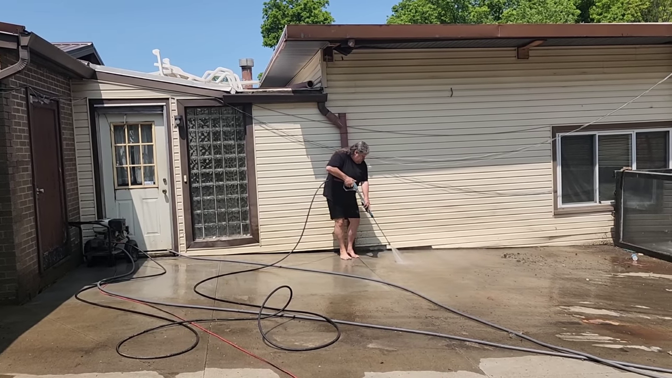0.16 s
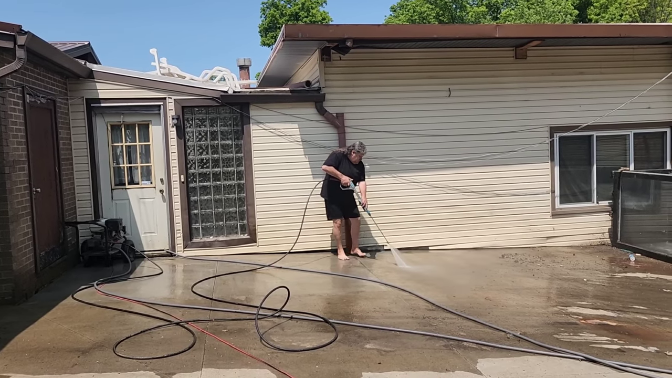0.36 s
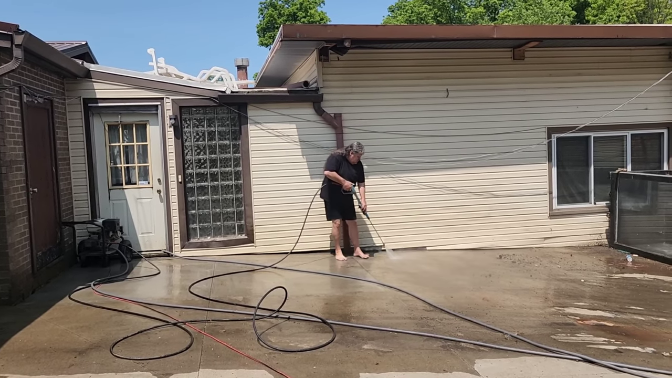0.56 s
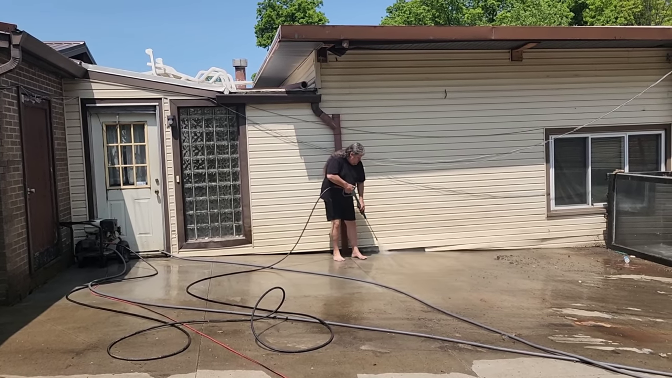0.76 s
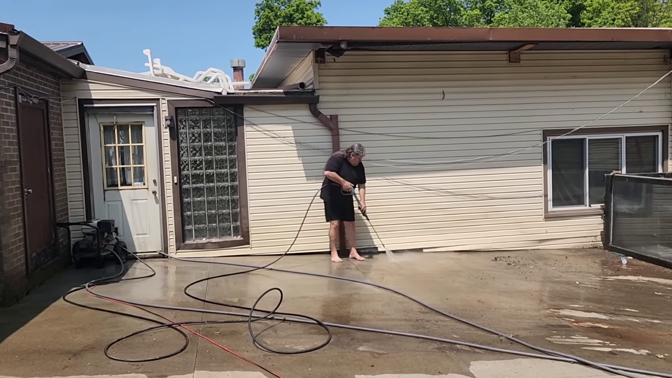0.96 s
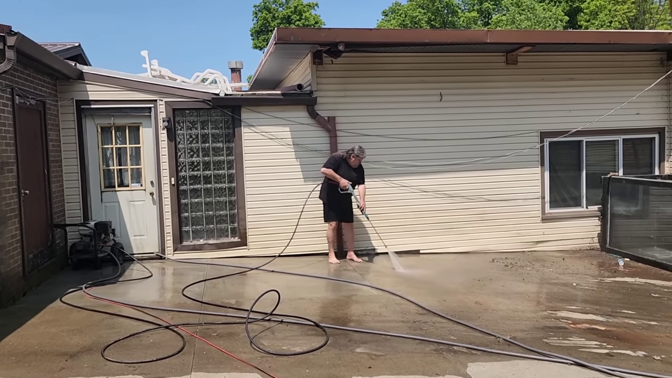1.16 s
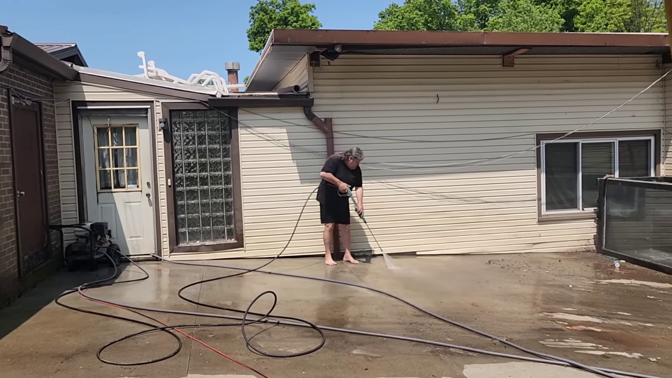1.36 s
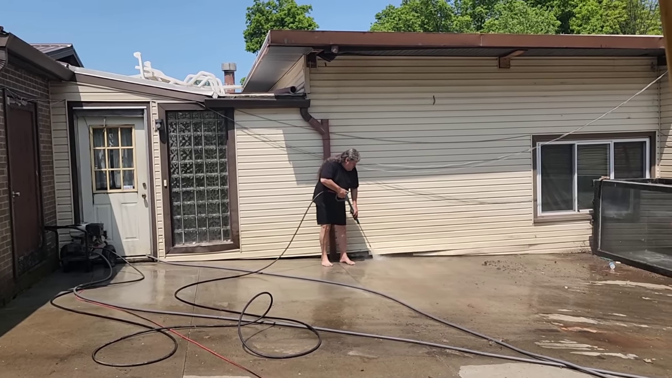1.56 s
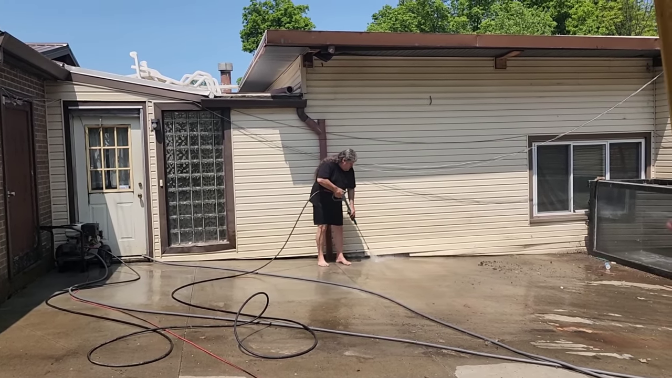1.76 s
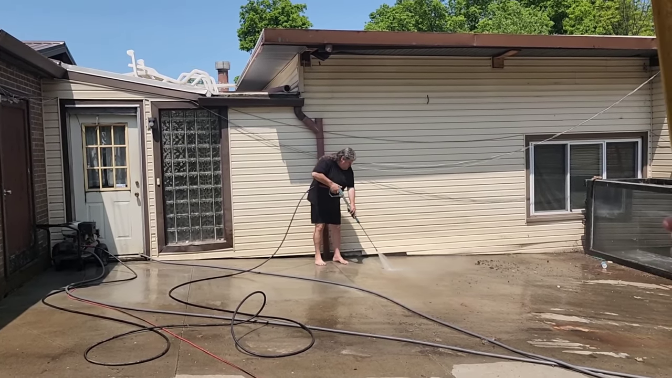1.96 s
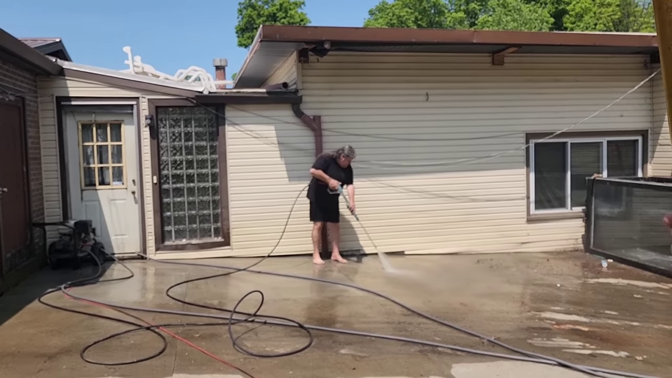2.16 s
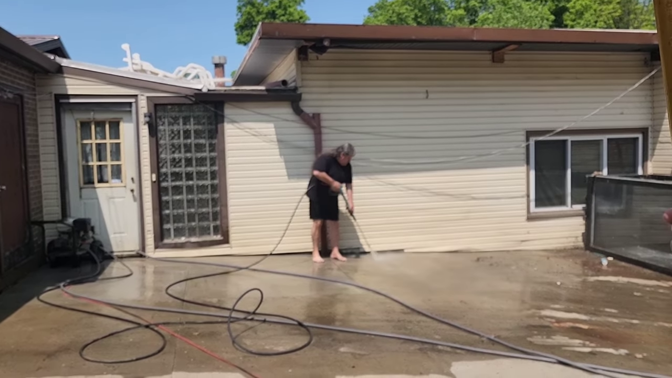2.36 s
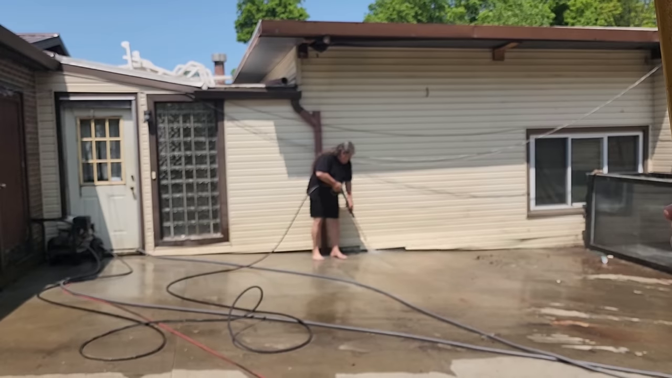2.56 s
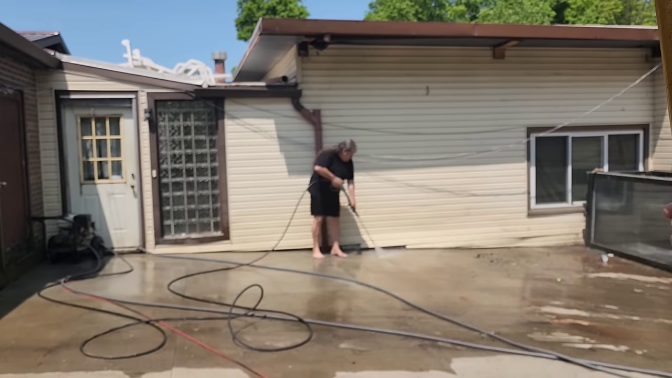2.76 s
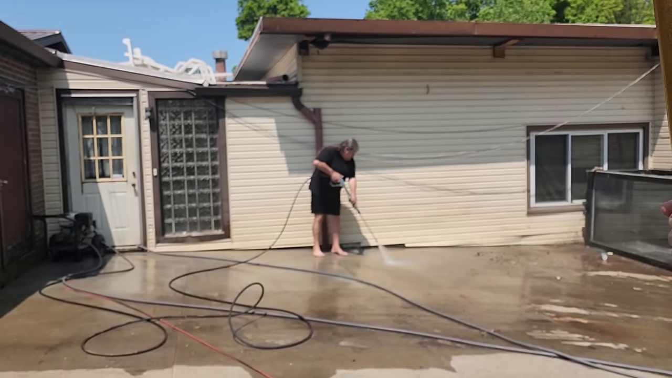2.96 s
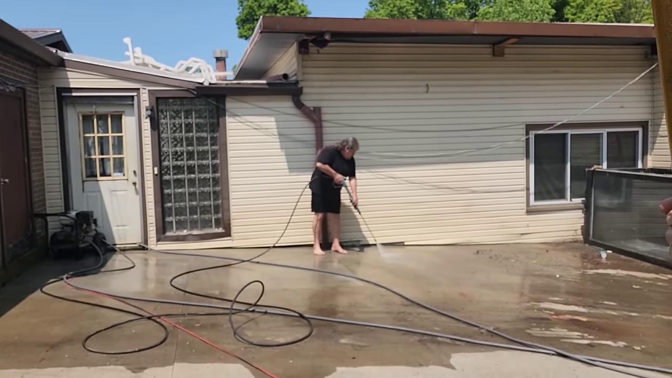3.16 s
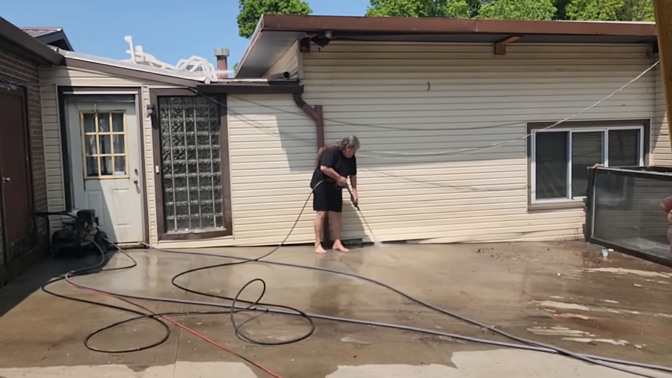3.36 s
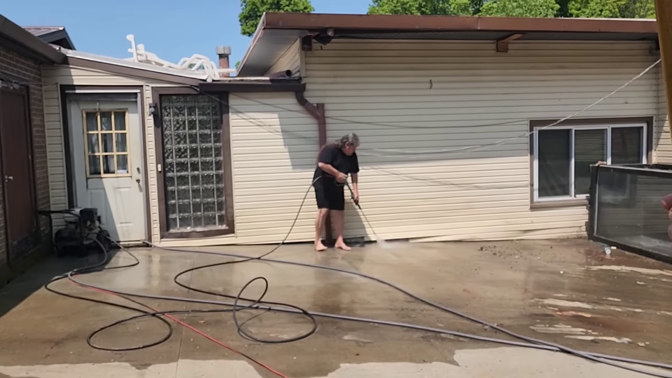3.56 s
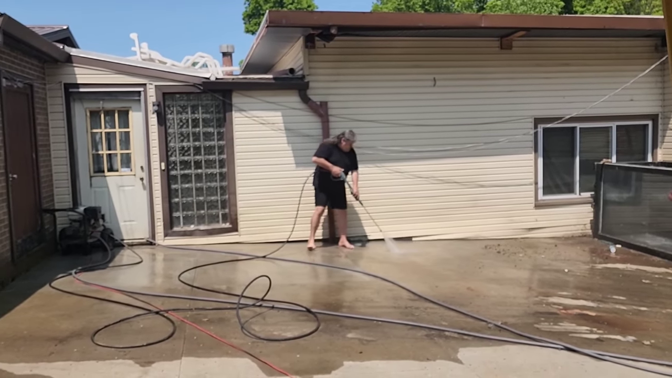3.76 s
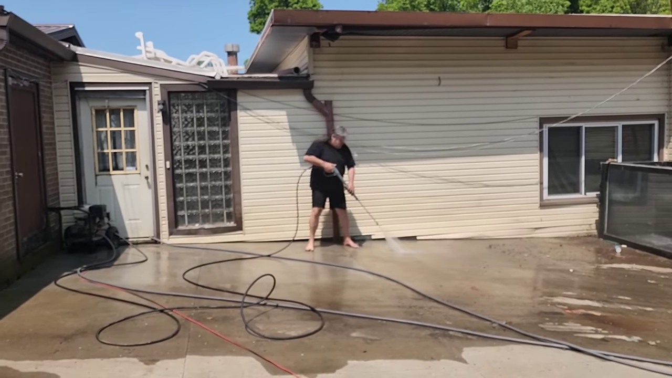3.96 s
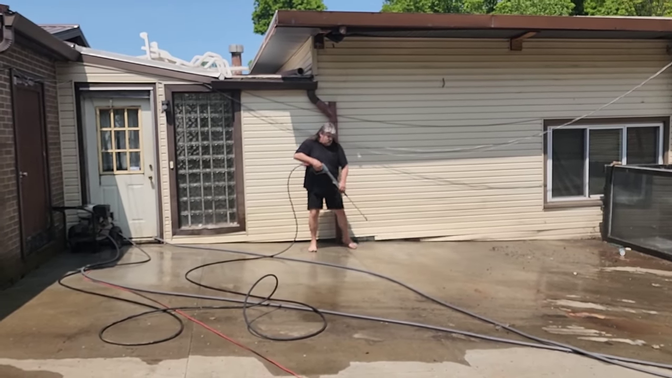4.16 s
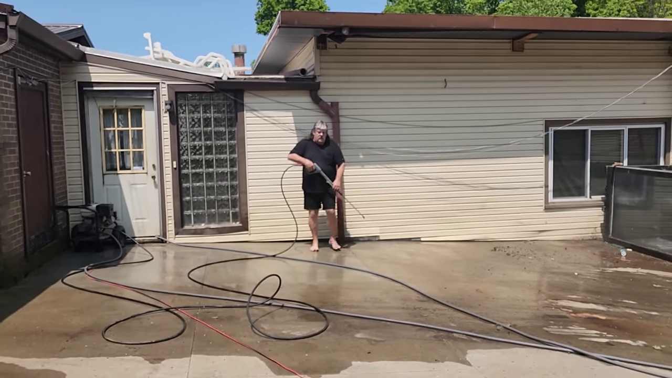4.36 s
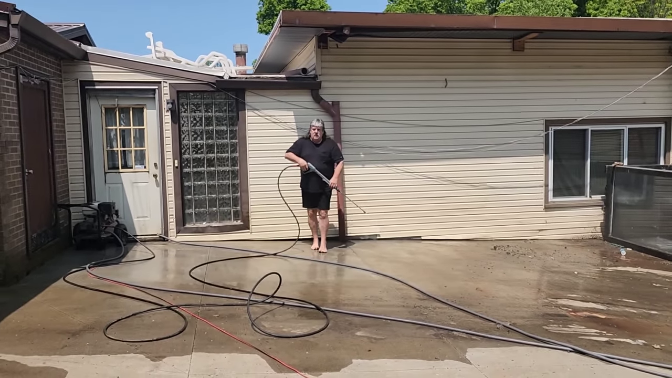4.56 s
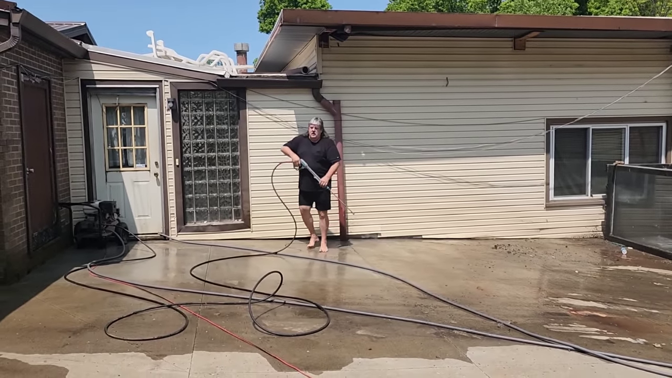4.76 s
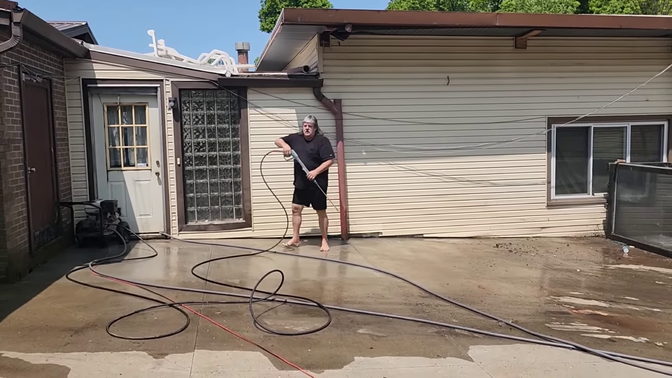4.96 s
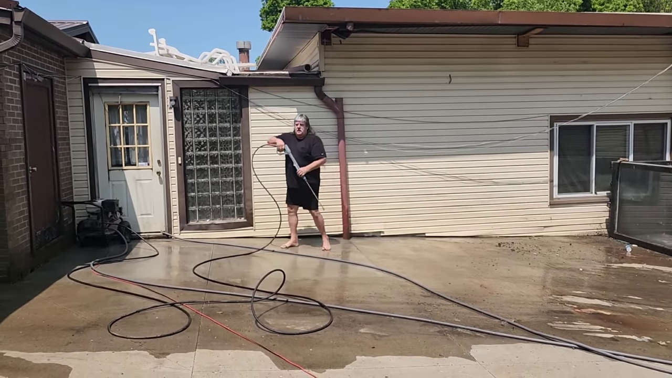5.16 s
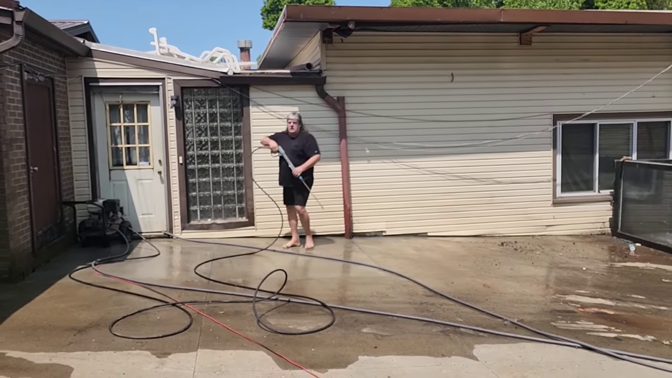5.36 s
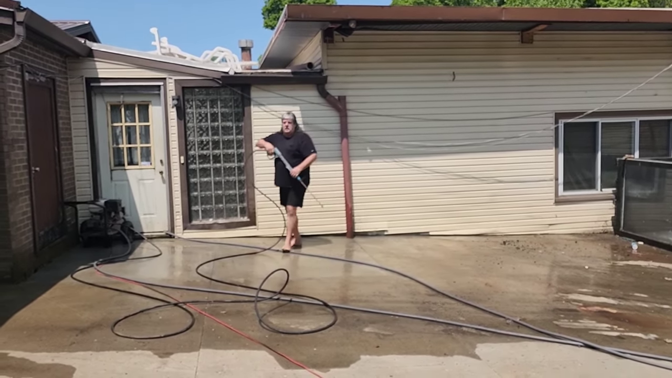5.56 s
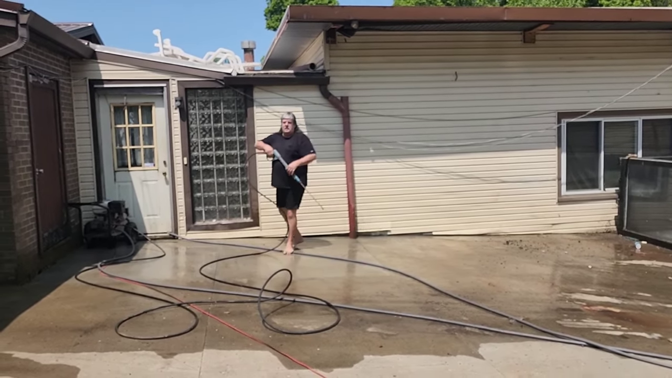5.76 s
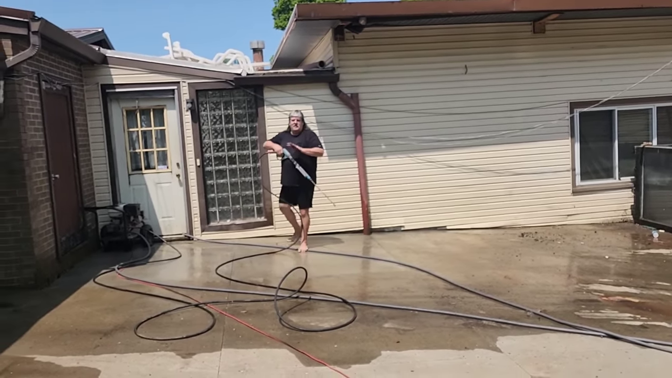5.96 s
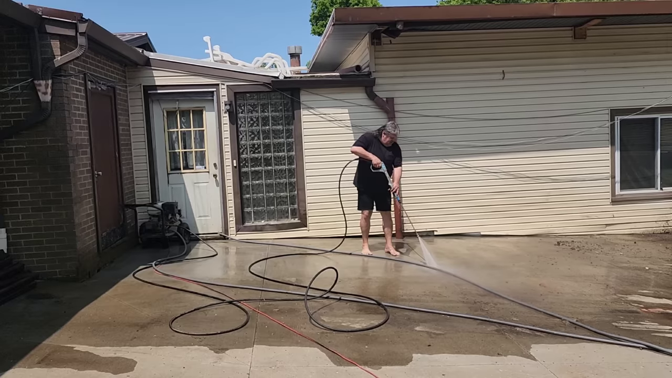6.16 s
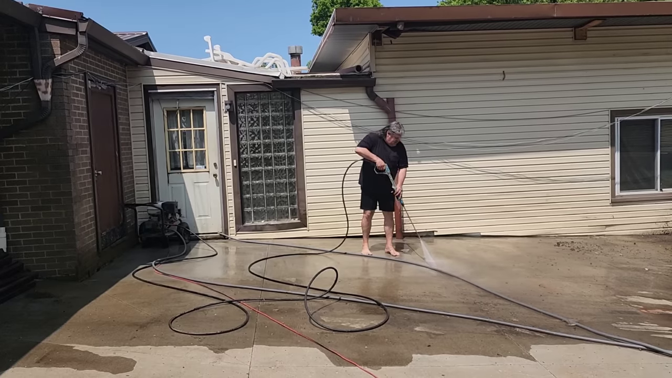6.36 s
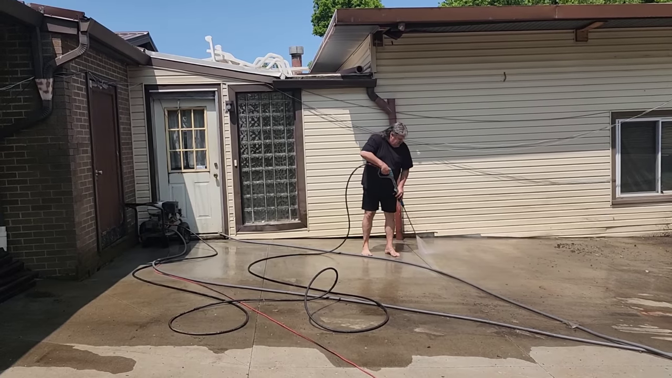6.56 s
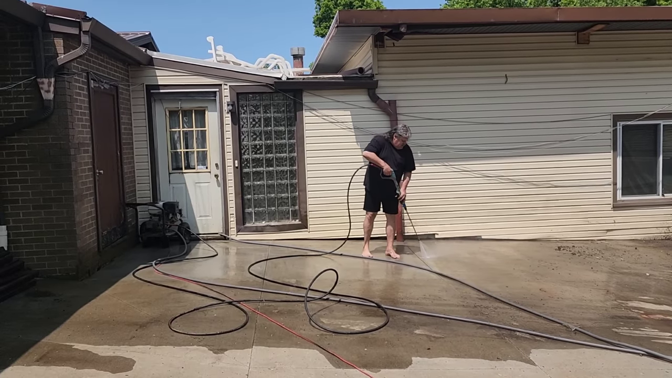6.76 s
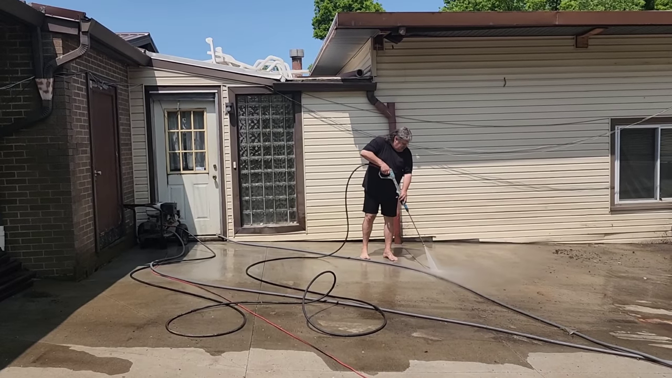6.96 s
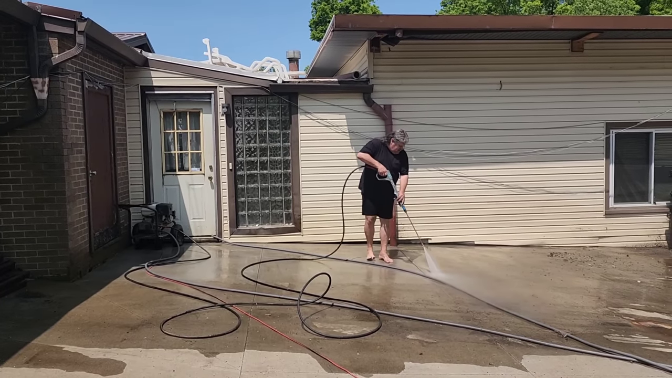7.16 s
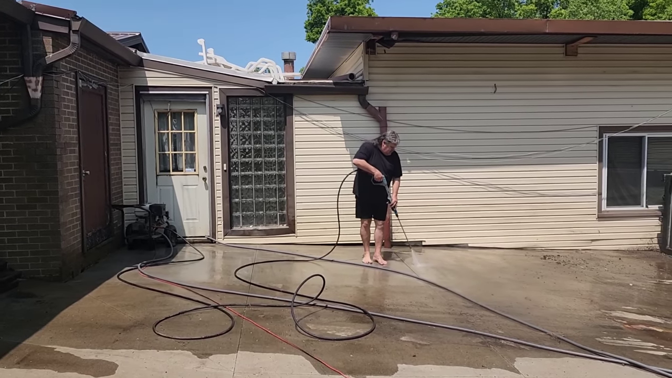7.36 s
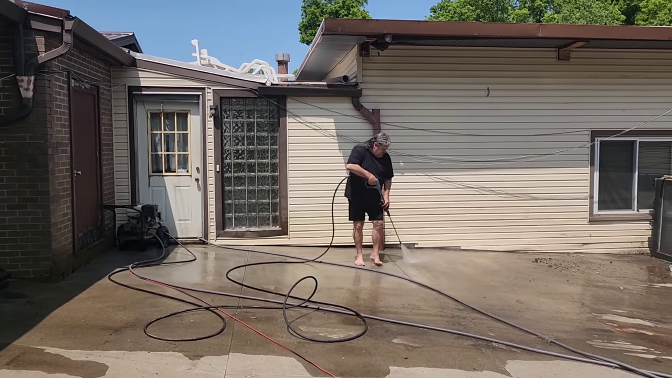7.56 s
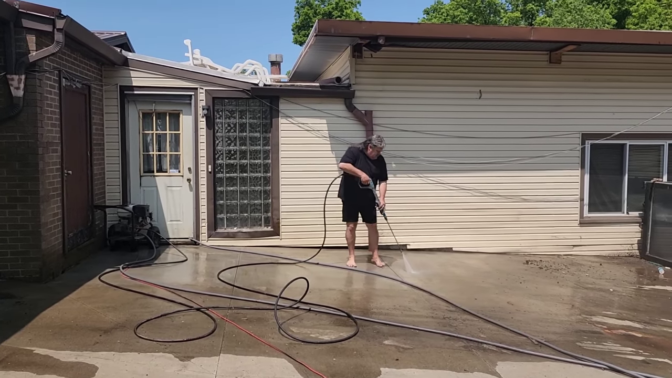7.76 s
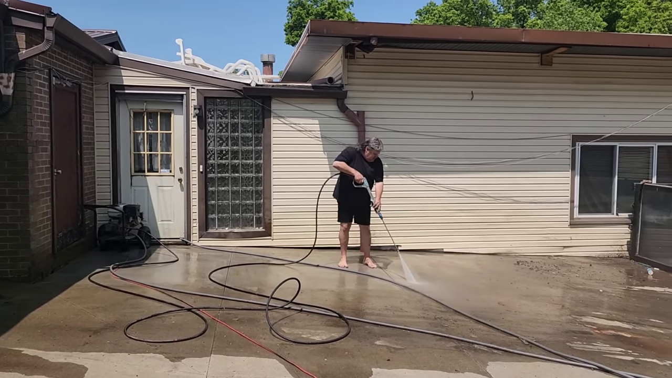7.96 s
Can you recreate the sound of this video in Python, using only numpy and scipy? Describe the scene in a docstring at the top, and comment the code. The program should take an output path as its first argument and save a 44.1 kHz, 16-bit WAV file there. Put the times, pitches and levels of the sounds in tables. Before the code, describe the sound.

Steady small-engine drone and bright water hiss outdoors; the spray stops for two seconds of uneven racing and puttering, then abruptly returns.

```python
"""A petrol pressure washer by a house wall drones steadily: pulses of exhaust and intake, once per engine cycle.
Its jet hisses on a concrete patio as coloured noise strewn with drops; fan, gears and valves rattle and whine.
Then the trigger is let go for about two seconds: the hiss stops, and the engine races as the pump lets go.
It sags and putters with misfires (dull whumps), and twice gulps air and surges as the governor hunts.
After a blink of near silence the jet and the loaded drone are back."""
import sys
import numpy as np
from scipy import signal
from scipy.fft import rfft, irfft, next_fast_len
from scipy.io import wavfile
from scipy.ndimage import uniform_filter1d

SR = 44100
rng = np.random.default_rng(int(sys.argv[2]) if len(sys.argv) > 2 else 0)


def master_out(mix):
    """Clip the mix to full scale and print it as 16-bit PCM to the path in sys.argv[1]."""
    frames = np.transpose(np.atleast_2d(mix))
    ceiling = np.clip(frames, -1, 1)
    pcm = np.round(ceiling * 32767).astype(np.int16)
    wavfile.write(sys.argv[1], SR, pcm)


N = 353219
TIME = np.arange(N) / SR
HZ = np.fft.rfftfreq(N, 1 / SR)


LATER_DB = 0.55  # the drone comes back a little stronger after the silence


def engine_note(turns, speed, load):
    """Exhaust and intake each pulse once in two revolutions, that is once per engine cycle."""
    before = loaded_note(turns, NOTE)
    after = amp(LATER_DB) * loaded_note(turns, LATER_NOTE)
    note = np.where(TIME < SILENCE[0], before, after)
    # without load the governor flaps the throttle: gulps of air, a muffler boom, lean puttering between
    booming = patio((1 - load) * muffler_boom(turns), echo_db=-15, t60=.16)
    gulping = patio(intake(turns, speed), echo_db=-9, t60=.14)
    puttering = patio((1 - load) * putter(turns), echo_db=-11, t60=.2)
    return load * note + booming + gulping + puttering + misfires()


# engine note under load, before and after the silence: (multiple of the firing rate, relative level/dB)
NOTE = [(1, -22), (2, 0), (3, -18), (4, -29.5), (5, -11), (6, -12), (7, -9.5), (8, -12), (9, -21),
        (10, -0.5), (11, -28), (12, -27), (13, -33), (14, -14.5), (15, -10), (16, -10), (17, -18),
        (18, -23), (19, -22.5), (20, -16.5), (21, -19), (22, -16), (23, -31), (24, -18.5), (25, -35),
        (26, -36)]
LATER_NOTE = [(1, -30), (2, 0), (3, -16.5), (4, -32), (5, -12), (6, -12), (7, -9.5), (8, -12), (9, -28.5),
              (10, 0.5), (11, -22), (12, -27), (13, -36), (14, -21.5), (15, -13), (16, -10.5), (17, -19.5),
              (18, -20), (19, -28), (20, -14), (21, -27.5), (22, -15.5), (23, -25), (24, -16.5), (25, -29),
              (26, -25)]
# a standing wave between the walls: (multiple of the firing rate, relative level/dB)
STANDING = [(12, -6), (13, 5)]
LOADED_EXHAUST_DB, LOADED_INTAKE_DB, STANDING_DB = -20, -27.5, -35.5


def loaded_note(turns, note):
    """Exhaust pulses carry the low harmonics, intake the higher; two stand between walls, opposed at the ears."""
    low_orders = [row for row in note[:12] if round(row[0]) != 2]  # the second comes from the frame's shaking
    exhaust = amp(LOADED_EXHAUST_DB) * drone(turns, low_orders, at=.88, smear=.7, scatter_db=0.3)
    air = amp(LOADED_INTAKE_DB) * drone(turns, note[12:], at=.87, smear=0.012, scatter_db=0.8)
    standing = amp(STANDING_DB) * drone(turns, STANDING, at=.9, smear=0, scatter_db=-0.5)
    standing = standing * np.array([[1], [-.7]])
    exhaust = patio(exhaust, echo_db=-22, t60=.16, lead_s=.00008, left_db=-.6)
    air = patio(air, echo_db=-18, t60=.16, lead_s=.00025, left_db=1.5)
    return exhaust + air + standing


# the frame goes slack before a fresh charge: (start before the race t/s, attack t/s, hold t/s, release t/s)
SLACK = (0.21, .07, .02, 0.073)
LOADED_SHAKE_DB, FREE_SHAKE_DB, SLACK_DB, KICK_DB = -18.5, -22, -2.5, 5


def frame_shake(turns, load):
    """The frame shakes once a revolution, as hard as the engine pushes; it kicks as the engine races."""
    free_db = FREE_SHAKE_DB + SLACK_DB * charges(SLACK) + KICK_DB * racing()
    shake_db = load * LOADED_SHAKE_DB + (1 - load) * free_db
    return amp(shake_db + 0.14 * drift(10)) * np.sqrt(2) * np.cos(4 * np.pi * turns)


# colour of the muffler's boom: (f/Hz, relative level/dB)
MUFFLER = [(60, -18), (140, -10.5), (215, -14.5), (262, -28), (276, -0.5), (284, 4), (292, -4), (310, -35),
           (360, -26), (700, -57)]
# a fresh charge fires up the exhaust: (start before the race t/s, attack t/s, hold t/s, release t/s)
BURN = (0.11, 0.092, 0.051, 0.14)
LEAN_EXHAUST_DB, BURN_DB = -37.5, 19  # BURN_DB is added by a full charge


def muffler_boom(turns):
    """Exhaust pops ring the muffler; without load they are faint until a fresh charge burns."""
    boom_db = LEAN_EXHAUST_DB + BURN_DB * charges(BURN)
    return amp(boom_db) * pops(turns, MUFFLER, at=0.79, scatter_db=2.5)


# colours of the air box's hoot and of the hard gulp: (f/Hz, relative level/dB)
AIRBOX = [(100, -22), (300, -17), (360, -10), (405, 1), (440, -5.5), (500, -16.5), (900, -39.5)]
GULP = [(60, -16), (140, -4), (185, 5.5), (230, -0.5), (270, 4.5), (320, 1.5), (420, 2), (480, 1.5),
        (540, 3), (620, -6), (690, -5), (850, -32), (2000, -30.5)]
HOOT_DB, OPEN_INTAKE_DB = -29, -23  # for a wide throttle
FIRST_RACE_DB, THROTTLE_CURVE = -1.5, 2.2
GULP_LAG_S = 0.071  # from letting go of the trigger


def intake(turns, speed):
    """The air box hoots as the valve opens; with the throttle wide, the valve shuts on a hard gulp."""
    opening = throttle(speed)
    hoot = amp(HOOT_DB) * np.sqrt(opening) * pops(turns, AIRBOX, at=.002, scatter_db=4.5)
    gulps = amp(OPEN_INTAKE_DB) * opening ** THROTTLE_CURVE * pops(turns, GULP, at=0.058, scatter_db=1.8)
    # at the first race the throttle is already closing, so it gulps less
    first_race = 1 - ramp(RACES[0][0] + SPIN_UP_S, SPIN_UP_S)
    unloaded = 1 - squeezed(GULP_LAG_S, UNLOAD_S)
    return unloaded * amp(FIRST_RACE_DB * first_race) * (hoot + gulps)


# lean puttering; the two lowest thump, the rest burble: (multiple of the firing rate, relative level/dB)
LEAN_NOTE = [(3, -0.5), (4, -1.5), (5, -15), (6, -17), (7, -5), (8, -7), (9, -4.5), (10, -2.5), (11, -14.5),
             (12, -3), (13, -1.5), (14, -2.5), (15, -19.5), (16, -15.5), (17, -19), (19, -8)]
THUMP_DB, RACING_THUMP_DB, BURBLE_DB = -29, -12, -30.5  # RACING_THUMP_DB is added during a race


def putter(turns):
    """The lean exhaust's harmonics glide with the speed; its thump fades during each race."""
    thump = drone(turns, LEAN_NOTE[:2], at=0.917, smear=0.018, scatter_db=2.7)
    burble = drone(turns + 0.0044 * drift(20), LEAN_NOTE[2:], at=.7, smear=0.1194, scatter_db=1.9)
    return amp(THUMP_DB + RACING_THUMP_DB * racing()) * thump + amp(BURBLE_DB) * burble


# misfires as the speed sags: (t/s, level/dB)
MISFIRES = [(4.43, -24), (4.519, -22), (4.645, -18), (4.735, -17)]
WHUMP_HZ, WHUMP_S = 85, 0.012  # pitch, and time to the loudest point


def misfires():
    """The starved engine stumbles: dull whumps in the muffler, each a short, dying low tone."""
    out = np.zeros(N)
    for s, db in MISFIRES:
        age = np.maximum(TIME - s, 0)
        envelope = age / WHUMP_S * np.exp(1 - age / WHUMP_S)
        out += amp(db) * envelope * np.sin(2 * np.pi * WHUMP_HZ * age)
    return out


# water on concrete, before and after the pause: (t/s, shared level/dB, extra fizz level/dB)
FIRST_JET = [(0.06, -29, 3), (0.1, -30.5, 4), (0.39, -31, 2.5), (1.02, -28.5, 3), (1.25, -31, 2),
             (1.6, -30, 3.5), (3.73, -30, 2.5), (4.16, -31.5, 2.5), (4.18, -29.5, 2)]
SECOND_JET = [(6.14, -29.5, 4), (6.16, -28.5, 4), (6.662, -30.5, 0.93), (7.19, -30, 6.6),
              (7.322, -30.5, 2.6), (7.682, -30, 1.2), (7.98, -29.5, 3.4)]
# colours of the spray before and after the pause, and of the fizz: (f/Hz, relative level/dB)
FIRST_SPRAY = [(40, 4), (200, 2), (700, -4.5), (1200, -2), (2000, 0), (2800, -5.5), (3400, -3), (4600, -3),
               (5550, 1.5), (6000, 0), (6400, 1.5), (6900, -2), (7400, 1), (7900, -1), (8300, 0.5),
               (9200, -8.5), (10200, -5), (12000, -5), (16000, -9.5)]
SECOND_SPRAY = [(40, 4), (200, 7), (800, -3.5), (1400, 2.5), (2000, 0), (2800, -4.5), (3300, -7), (4150, 1),
                (5000, -5.5), (5600, -0.5), (6250, -0.5), (7300, 2), (8000, -1.5), (8700, -5), (9600, -5),
                (10800, -5), (12000, -7), (16000, -12)]
FIZZ = [(7000, -28), (10500, -5), (11700, 3), (13000, 2), (16000, -2)]
SPRAY_DB, FIZZ_DB = 6.5, 4  # added to the levels above
JET_FADE_S = 0.093


def jet():
    """Water shatters on concrete; the mist fizzes more or less with the angle of the wand."""
    level_db, fizz_db = curves([*FIRST_JET, *SECOND_JET])
    flutter_db = 0.12 * drift(16) + 0.79 * drift(300)
    drops = droplets(4000, size_db=2.0, share=0.42)
    first = spread(drops, read(FIRST_SPRAY, HZ))
    second = spread(drops, read(SECOND_SPRAY, HZ))
    spray = np.where(TIME < SQUEEZE_S, first, second)
    # short patches flicker, long ones let the hiss change colour
    spray = patchy(patchy(spray, patchy_db=1.53), patchy_db=1.2, size=110)
    fizz = patchy(spread(droplets(5000, size_db=4.5, share=0.54), read(FIZZ, HZ)), patchy_db=1.3)
    water = amp(SPRAY_DB) * spray + amp(fizz_db + FIZZ_DB) * fizz
    return squeezed(0, JET_FADE_S) * amp(level_db + flutter_db) * water


def droplets(per_second, size_db, share):
    """A dense rush of noise with single drops of all sizes, each a click, standing out of it."""
    sizes = amp(size_db * np.minimum(rng.exponential(1, (2, N)), 4))
    drops = white() * sizes * (rng.random((2, N)) < per_second / SR)
    return white() + share * evened(drops)


def patchy(x, patchy_db, size=9):
    """Turbulence lifts and lowers patches of the spectrum, some hundred Hz wide and size frames long."""
    z = signal.stft(x, nperseg=512)[2]
    field = uniform_filter1d(rng.standard_normal(z.shape[1:]), size=6, axis=0)
    field = evened(uniform_filter1d(field, size=size, axis=1))
    return evened(signal.istft(z * amp(patchy_db * field))[1][:, :N])


# colour of the hissing gas: (f/Hz, relative level/dB)
BLOW = [(600, -13.5), (1500, 6), (1850, 5), (2150, 12), (2450, -12), (2900, -3.5), (4500, 2), (8000, 0.5),
        (9500, -4.5), (13000, 4), (16000, -6)]
# hot gas hisses out of the muffler as the engine races: (t/s, hold t/s, level/dB)
BLOW_OFFS = [(4.242, 0.078, -35), (4.9, 0.071, -27.5), (5.662, 0.095, -26)]
BLOW_ATTACK_S, BLOW_RELEASE_S = 0.011, 0.077
LOADED_BLOW_DB, LEAN_BLOW_DB = -28, -37


def gas_hiss(turns, load):
    """Gas rushes out in a puff of noise on each exhaust stroke, with extra bursts as the engine races."""
    puffs = evened(0.31 + puff(turns, at=0.716, rise=0.068, fall=0.28))
    puffs = puffs * each_cycle(turns, 0.64, scatter_db=0.97)
    spits = evened(0.23 + puff(turns, at=0.68, rise=0.03, fall=0.21))
    blow_off = sum(amp(db) * swell(s, 0, BLOW_ATTACK_S, hold, BLOW_RELEASE_S) for s, hold, db in BLOW_OFFS)
    puff_gain = amp(load * LOADED_BLOW_DB + (1 - load) * LEAN_BLOW_DB)
    return (puff_gain * puffs + blow_off * spits) * spread(white(), read(BLOW, HZ))


def puff(turns, at, rise, fall):
    """A valve cracks open once a cycle and the pressure drains away (times as shares of a cycle)."""
    age = (turns - at) % 1
    return np.minimum(age / rise, 1) * np.exp(-age / fall)


# colour of the rattle: (f/Hz, relative level/dB)
CLATTER = [(25, 1), (100, -1), (200, 7.5), (400, 5), (700, 2), (1350, 1), (2280, 0), (2550, -4.5),
           (5000, -7.5), (7500, -10), (9500, -14.5), (13200, -8), (16000, -22)]


def clatter(turns, speed, load):
    """Fan and valve gear rattle: noise swelling slightly once a revolution, louder with speed."""
    beat = evened(1 + 0.056 * stroke(2 * turns, at=0.36, width=0.11)) * amp(0.38 * drift(90))
    rattle = patchy(spread(white(), read(CLATTER, HZ)), patchy_db=1.6) * beat
    level_db = -27.7 + 28 * np.log10(speed / speed.mean()) - 2.16 * load + (1 - load) * rattle_rise_db()
    return amp(level_db) * rattle


RATTLE_RISE_DB, RATTLE_RISE_S = 3.5, 0.78


def rattle_rise_db():
    """The rattle grows a little as the engine runs free."""
    return RATTLE_RISE_DB * (ramp(RACES[0][0], RATTLE_RISE_S) - .7)


# ringing of the engine's casing, also used by the fan tones: (f/Hz, width f/Hz, relative level/dB)
CASING = [(869.4, 21, -1), (1120, 60, -4), (1500, 27, 1), (2040, 320, -6)]
WAVER_DB = 3  # slow random wavering of each tone


def whine(turns, speed, load):
    """Fan and gears repeat a rough pattern each cycle; its harmonics glide through wavering casing resonances."""
    pattern = irfft(np.exp(2j * np.pi * rng.random((2, 257))))
    running = [np.interp(turns % 1, np.arange(len(p)) / len(p), p, period=1) for p in pattern]
    drive, tones = evened(np.array(running)) + 0.62 * white(), 0
    for hz, width, db in CASING:
        ring = signal.lfilter(*signal.iirpeak(hz, hz / width, fs=SR), drive)
        ring = signal.lfilter(*signal.iirpeak(hz, hz / width / 3, fs=SR), ring)
        tones = tones + amp(db + WAVER_DB * drift(7)) * ring
    level_db = -38 + 41 * np.log10(speed / speed.mean()) - 7.2 * load + (1 - load) * rattle_rise_db()
    return amp(level_db) * spread(tones, np.zeros(len(HZ)))


# tones of fan and gears: (multiple of the firing rate, level/dB on a resonance before load and wavering)
FAN_TONES = [(28, -42.5), (30, -47.5), (35, -47), (36, -47), (38, -48.5), (46, -55), (48, -43.5), (70, -51),
             (71, -48)]
LOADED_FAN_DB = -10.5  # added under load


def fan_tones(turns, speed, load):
    """Clean tones of fan blades and gear teeth glide with the speed and sing out on a casing resonance."""
    out = 0
    for order, db in FAN_TONES:
        hz_now = round(order) * speed
        ring = np.max([1 / np.hypot(1, (hz_now - hz) / width) for hz, width, _ in CASING], axis=0)
        phase = rng.uniform(0, 0.26, (2, 1))  # left and right differ a little
        tone = np.sqrt(2) * np.cos(2 * np.pi * (round(order) * turns + phase))
        out = out + amp(db + WAVER_DB * drift(7)) * ring * tone
    # half the rattle's rise when free, and the opposite under load
    return amp(load * LOADED_FAN_DB + (0.5 - load) * rattle_rise_db()) * out


# the unloaded engine races, first as the pump lets go, then on each fresh charge:
# (t/s, coasting down t/s, fresh charge 0-1)
RACES = [(4.248, .44, 0), (4.92, .56, 1), (5.683, .49, 1)]
LOADED_RATE, SAGGED_RATE, RACE_GAIN = 28.66, 27.96, 3.41  # engine cycles per second
SPIN_UP_S, COAST_CURVE = .115, 1.88


def crank_speed():
    """Steady against the pump; without it the engine spins up quickly and coasts down ever faster, repeatedly."""
    free = ramp(RACES[0][0], SPIN_UP_S / 2) * (TIME < SILENCE[0])
    surges = sum(ramp(s, SPIN_UP_S) - ramp(s + SPIN_UP_S, coast) ** COAST_CURVE for s, coast, _ in RACES)
    return LOADED_RATE + free * (SAGGED_RATE + RACE_GAIN * surges - LOADED_RATE)


GOVERNOR_LAG_S, WIDE_OPEN_SAG = 0.062, 0.73  # the sag is a share of RACE_GAIN


def throttle(speed):
    """The slower the unloaded engine ran a moment ago, the wider the governor opens the throttle (0-1)."""
    sag = 1 - (np.interp(TIME - GOVERNOR_LAG_S, TIME, speed) - SAGGED_RATE) / RACE_GAIN
    return np.clip(sag / WIDE_OPEN_SAG, 0, 1)


# the trigger: let go and squeezed again; the jet dies first, then the pump unloads
LET_GO_S, SQUEEZE_S = 4.18, 6.04
UNLOAD_LAG_S, UNLOAD_S, PICK_UP_S = 0.092, 0.081, 0.046


def squeezed(lag, fade):
    """One while the trigger is held; fades to zero after it is let go."""
    return 1 - ramp(LET_GO_S + lag, fade) + ramp(SQUEEZE_S, PICK_UP_S)


def charges(shape):
    """One swell for each fresh charge."""
    return sum(charge * swell(s, *shape) for s, _, charge in RACES)


# the swell of each race: (start before the race t/s, attack t/s, hold t/s, release t/s)
KICK = (0.026, 0.096, .04, 0.092)


def racing():
    """One swell for each race."""
    return sum(swell(s, *KICK) for s, _, _ in RACES)


def swell(s, lead, attack, hold, release):
    """Attack, hold and release, beginning lead seconds before s."""
    return ramp(s - lead, attack) - ramp(s - lead + attack + hold, release)


def ramp(start, length):
    """A straight rise from zero to one."""
    return np.clip((TIME - start) / length, 0, 1)


def drone(turns, orders, at, smear, scatter_db):
    """A pressure pulse at one point of each cycle, ringing on in the given harmonics."""
    gain = np.zeros(1025)
    for k, db in orders:
        gain[round(k)] = amp(db)
    spectrum = rfft(causal(gain / gain.max()))
    # chambers hold back the higher harmonics longer, which smears the pulse over the cycle
    delay = np.exp(-1j * smear * np.arange(len(gain)) ** 2)
    wave = evened(irfft(spectrum * delay))
    swing = uniform_filter1d(each_cycle(turns, at, scatter_db), size=100)
    return swing * np.interp(turns - at, np.arange(len(wave)) / len(wave), wave, period=1)


def pops(turns, colour, at, scatter_db):
    """One uneven pop per cycle into fixed resonances."""
    clicks = np.diff(np.floor(turns - at), prepend=np.floor(turns[0] - at))
    ring = causal(amp(read(colour, np.fft.rfftfreq(4096, 1 / SR))))
    return evened(signal.oaconvolve(clicks * each_cycle(turns, at, scatter_db), ring)[:N])


def each_cycle(turns, at, scatter_db):
    """A random gain for every engine cycle: no two charges burn alike."""
    cycle = np.floor(turns - at).astype(int) + 2
    return amp(scatter_db * rng.standard_normal(512)[cycle])


def stroke(turns, at, width):
    """A smooth window open for a share of each cycle."""
    return np.exp(-((turns - at + .5) % 1 - .5) ** 2 / (2 * width ** 2))


def causal(gain):
    """The response of a resonating body to one blow: sharp start, ringing tail."""
    log_gain = np.log(np.maximum(gain, 1e-3))
    circle = np.r_[log_gain, log_gain[-2:0:-1]]
    # this phase packs the energy as early as the gains allow
    return irfft(np.exp(np.conj(signal.hilbert(circle)))[:len(gain)])


def patio(x, echo_db, t60, lead_s=0.00019, left_db=0.):
    """The engine stands to the left: sound reaches that side first, then walls and ground scatter it."""
    t = np.arange(SR // 4) / SR
    taps = rng.standard_normal((2, len(t))) * amp(-60 * t / t60)
    taps = signal.sosfilt(signal.butter(2, 250, "high", fs=SR, output="sos"), taps)
    taps /= np.linalg.norm(taps, axis=1, keepdims=True)
    right = np.interp(TIME - lead_s, TIME, x) / amp(left_db / 2)
    direct = np.array([x * amp(left_db / 2), right])
    return direct + amp(echo_db) * signal.oaconvolve(x[None], taps, axes=1)[:, :N]


# how alike the two microphones hear a noise: (f/Hz, likeness -1 to 1)
LIKENESS = [(245, 1), (300, -0.3), (640, 0.52), (1400, -0.36), (3100, 0.1448), (15000, -0.03)]
# how much stronger the left one hears it: (f/Hz, left minus right level/dB)
TILT = [(700, 3.5), (1300, 1), (2200, 5), (2900, 0), (4400, -1), (7400, 2), (8400, -1.5), (11000, -3),
        (13000, -7), (15000, -8)]


def spread(drive, colour_db):
    """Colours two unrelated signals and blends them as the two microphones hear them."""
    size = next_fast_len(N)
    hz = np.fft.rfftfreq(size, 1 / SR)
    a, b = rfft(drive, size)
    same = np.clip(read(LIKENESS, hz), -1, 1)
    side = amp(read(TILT, hz) / 2)
    pair = np.array([a * side, (same * a + np.sqrt(1 - same ** 2) * b) / side])
    return evened(irfft(pair * amp(np.interp(hz, HZ, colour_db)), size)[:, :N])


def white():
    """Two unrelated noises."""
    return rng.standard_normal((2, N))


def drift(top_hz):
    """Slow random wandering of rms one, with nothing much faster than top_hz."""
    t = TIME[::64]
    rates = np.geomspace(top_hz / 20, top_hz, 40) * np.exp(rng.uniform(-1, 1, 40) / 20)
    waves = np.sin(2 * np.pi * (rates[:, None] * t + rng.random((40, 1))))
    return np.interp(TIME, t, evened(waves.sum(0)))


def amp(db):
    """Decibels to gain."""
    return 10 ** (np.asarray(db) / 20)


def evened(x):
    """Scales to an rms of one."""
    return x / np.sqrt(np.mean(x ** 2) + 1e-20)


def curves(rows):
    """The columns of a table, joined by straight lines in time."""
    s, *columns = np.transpose(rows)
    return [np.interp(TIME, s, c) for c in columns]


def read(points, hz):
    """A spectrum joined by straight lines on a log-frequency axis."""
    f, value = np.transpose(points)
    return np.interp(np.log(hz + 1), np.log(f + 1), value)


FIRST_TURN = .23  # where in its cycle the engine starts (0-1)


def scene():
    """One crankshaft drives every engine sound; the trigger loads it and opens the jet."""
    speed, load = crank_speed(), squeezed(UNLOAD_LAG_S, UNLOAD_S)
    turns = FIRST_TURN + np.cumsum(speed) / SR + 0.0014 * drift(10)  # counted in engine cycles
    engine = engine_note(turns, speed, load) + frame_shake(turns, load)
    noise = gas_hiss(turns, load) + clatter(turns, speed, load)
    tones = whine(turns, speed, load) + fan_tones(turns, speed, load)
    return engine + jet() + noise + tones


# the near silence: (start t/s, end t/s)
SILENCE = (6.0335, 6.076)
EDGE_HZ = 15560  # nothing much is heard above this


def record(dry):
    """The sound drops out for a moment; then a low-pass filter limits the band."""
    silent = (TIME > SILENCE[0]) & (TIME < SILENCE[1])
    cut = dry * uniform_filter1d(np.where(silent, amp(-49), 1), size=50)
    low_pass = signal.firwin(511, EDGE_HZ, window=("kaiser", 9), fs=SR)
    return signal.oaconvolve(cut, low_pass[None], "same")


dry = scene()
out = record(dry)
master_out(out)
```